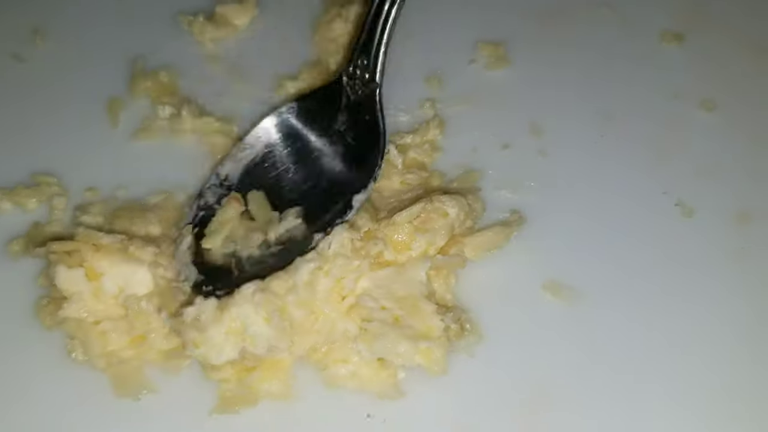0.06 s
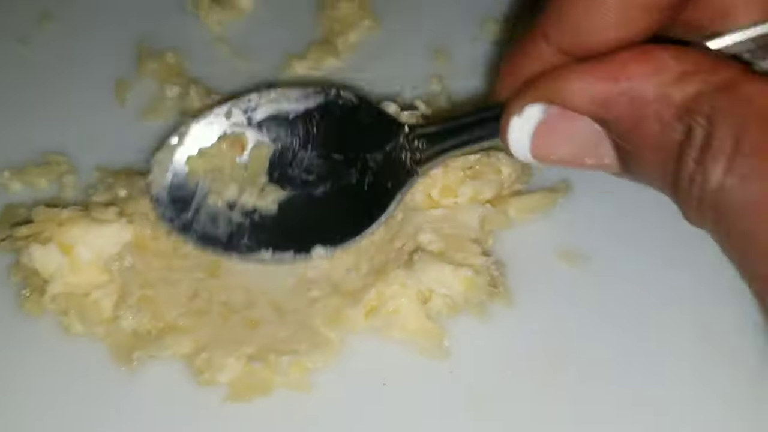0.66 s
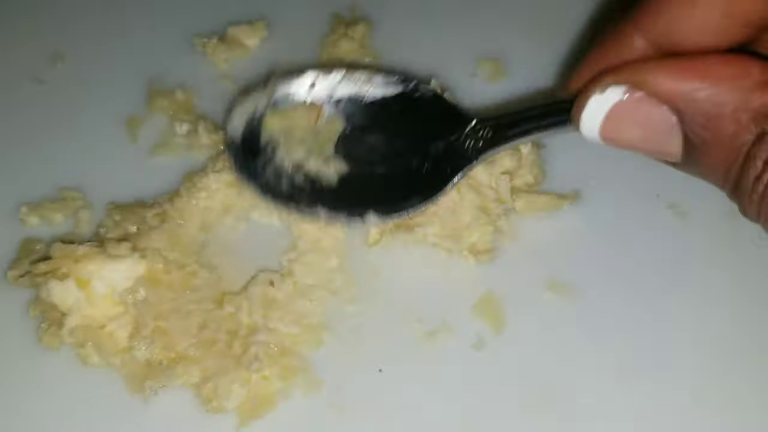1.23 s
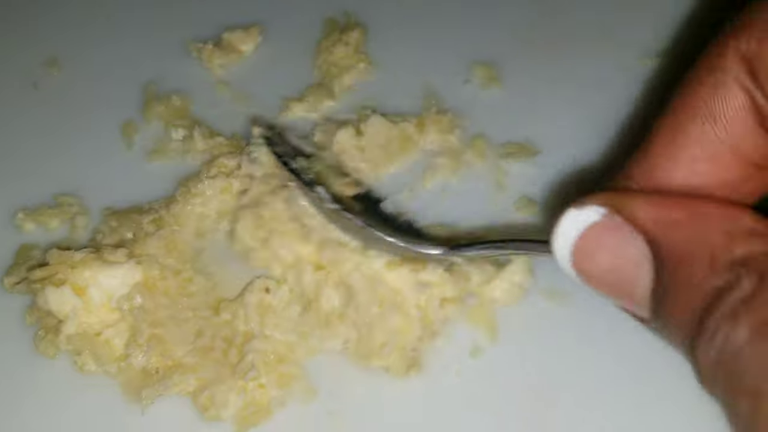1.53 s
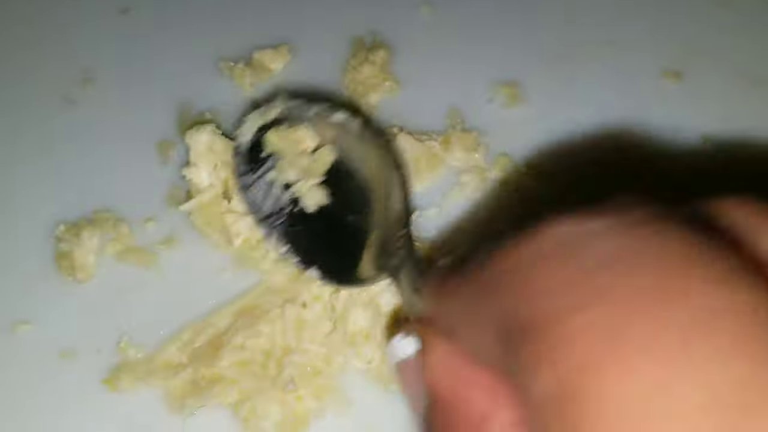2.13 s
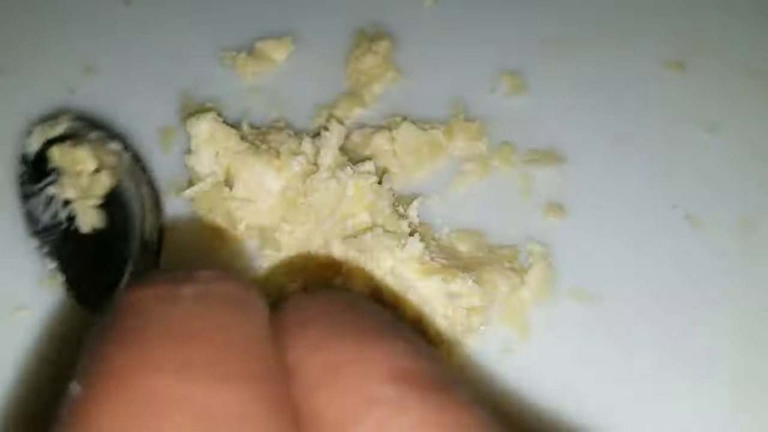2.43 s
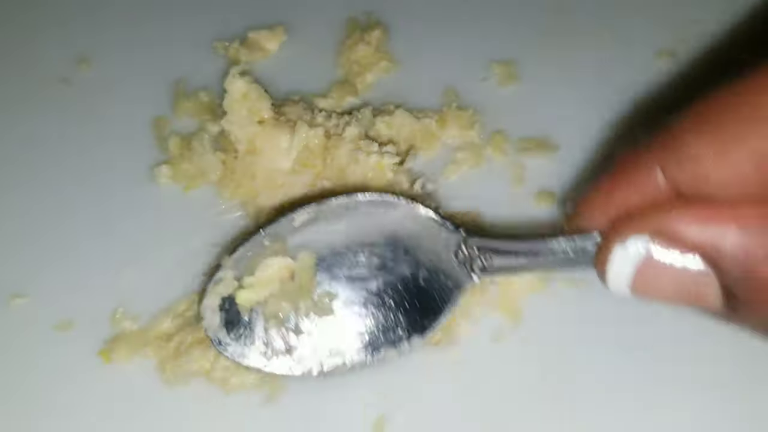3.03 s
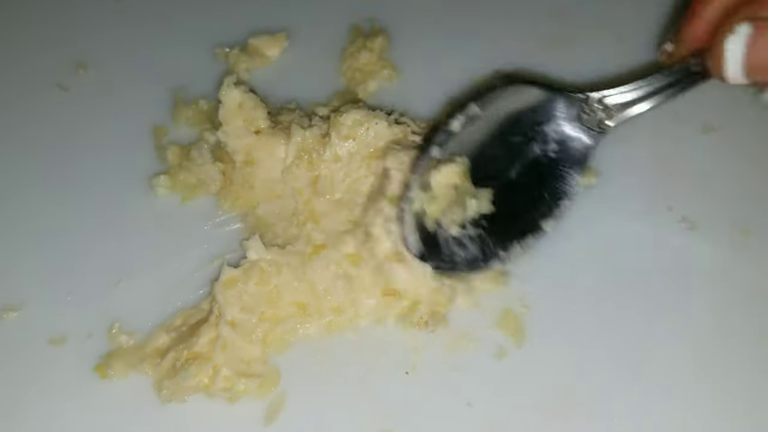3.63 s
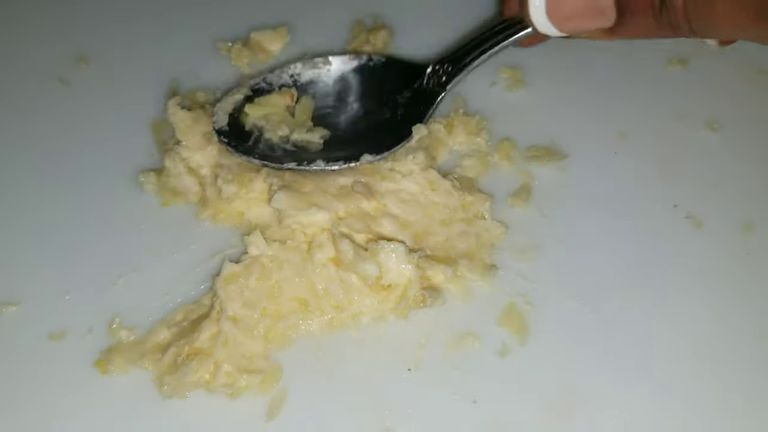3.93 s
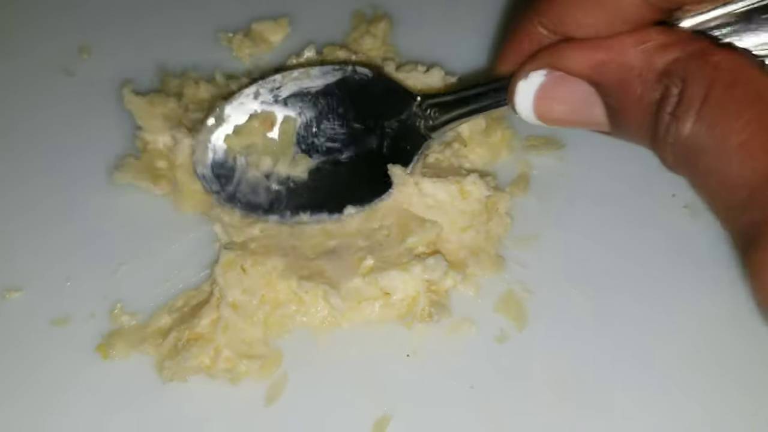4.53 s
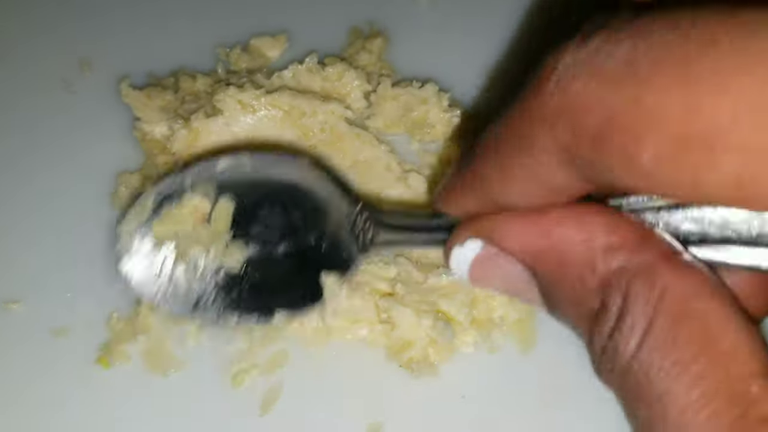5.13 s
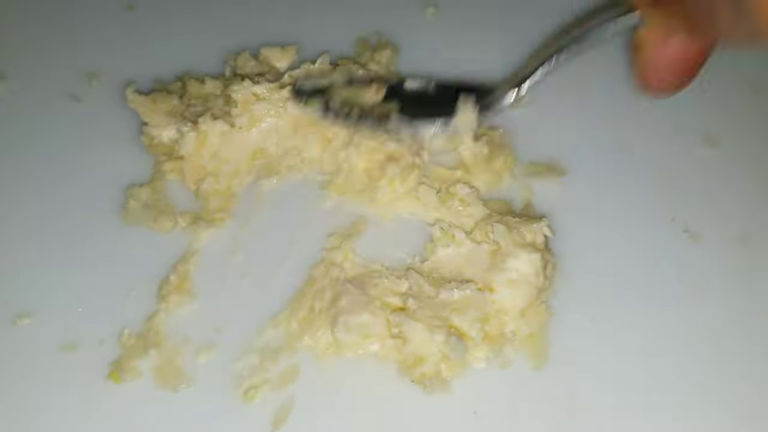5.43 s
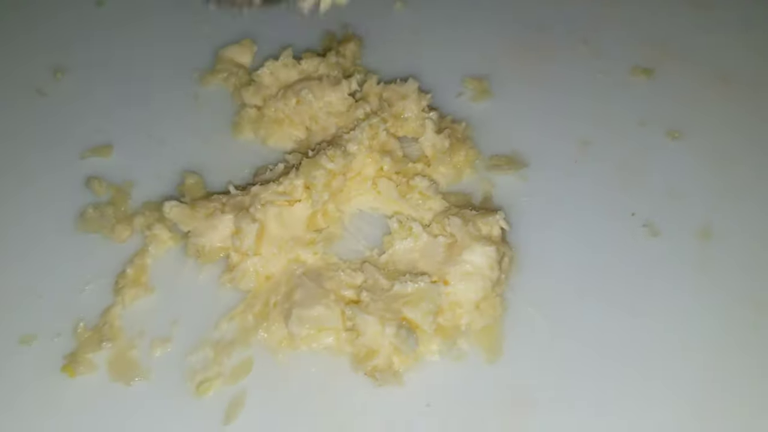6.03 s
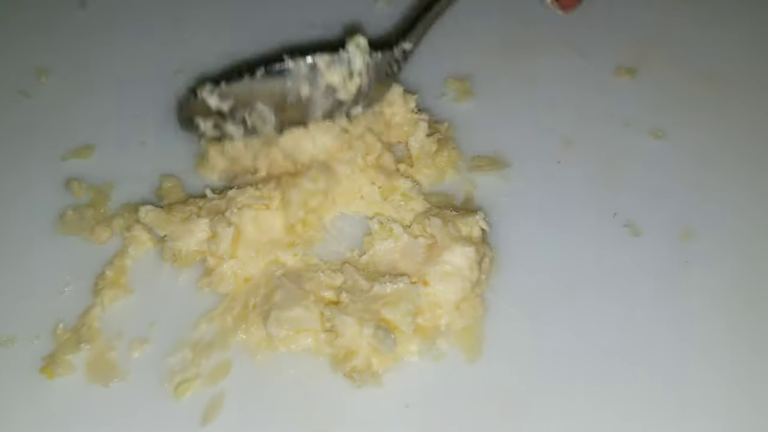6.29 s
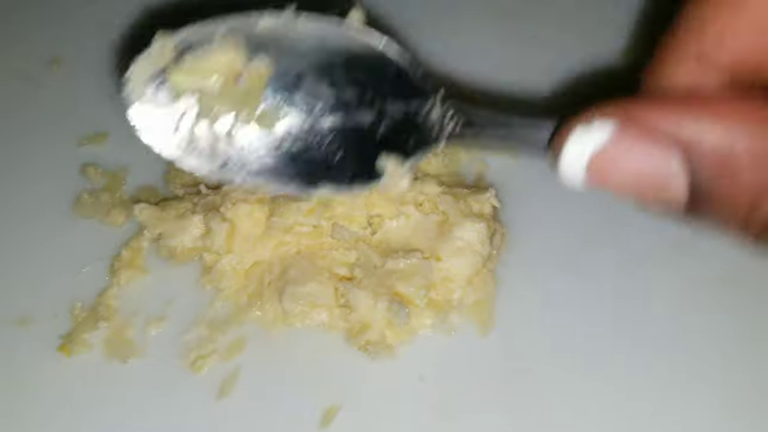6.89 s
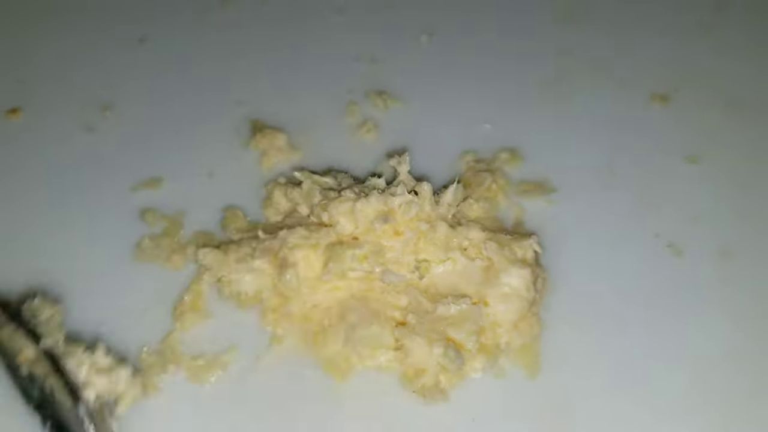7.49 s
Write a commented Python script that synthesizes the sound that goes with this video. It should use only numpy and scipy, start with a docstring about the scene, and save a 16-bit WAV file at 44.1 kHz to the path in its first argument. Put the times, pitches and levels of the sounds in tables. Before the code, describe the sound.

Soft wet smacks of butter and garlic being mashed, broken by a metal spoon's dull knocks and short scrapes on a cutting board.

```python
"""Butter crackles and smacks softly as a steel spoon mashes it with garlic, close by in a small kitchen.
The spoon knocks through onto a plastic cutting board, and each impact rings the modes of board and steel.
Its rim then drags, and stick-slip friction drives the board's modes into a growl. Between strokes, air
pockets burst as the butter peels off the steel. The room reverberates, and an appliance hums behind."""
import sys
import numpy as np
from scipy import signal
from scipy.fft import rfft, irfft, next_fast_len
from scipy.io import wavfile
from scipy.ndimage import map_coordinates

SR = 44100
rng = np.random.default_rng(int(sys.argv[2]) if len(sys.argv) > 2 else 0)


def inscribe(sig):
    """Save sig as 16-bit PCM at rate SR to the path in sys.argv[1].

    A 1-D sig is mono; a 2-D sig holds one channel per row.
    Samples are clipped to [-1, 1] before scaling.
    """
    pcm = np.round(np.clip(np.atleast_2d(sig).T, -1, 1) * 32767)
    wavfile.write(sys.argv[1], SR, pcm.astype(np.int16))


N = 341775

# modes of the board under the spoon: (frequency [Hz], level [dB], t60 [s])
BOARD_MODES = [(243, -12.5, 0.25), (416.5, 3.5, 0.093), (525, -6, 0.078), (615.7, -4, 0.064),
               (731, -9, 0.12), (814.4, -2.5, 0.1), (929.6, -1.5, 0.086), (1122, -12, 0.2),
               (1313, -1, 0.081), (1374, -5, 0.1), (1429, -2, 0.094), (1656.5, 7.5, 0.054),
               (1822, 3, 0.042), (1945, -4.5, 0.048), (2140, -14.5, 0.055), (2541, 0.5, 0.046),
               (2710, -8.5, .09), (2916, 1, 0.044)]
# modes of the spoon's bowl, damped by butter and fingers: (frequency [Hz], level [dB], t60 [s])
SPOON_MODES = [(5600, -19.5, .07), (5424, 2, 0.041), (7300, -10, .06), (8800, -12, 0.11),
               (8240, -13.5, 0.034), (10200, -3.5, 0.036)]
# spectra of an impact's three parts: (frequency [Hz], relative level [dB])
KNOCK_SPECTRUM = [(60, -40.5), (160, -9.5), (240, -6.5), (310, -9.5), (420, 3), (560, 3.5), (850, 2.5),
                  (1250, -1), (1700, -25), (3000, -39)]
CLACK_SPECTRUM = [(600, -18), (1200, 6.5), (1620, -1), (1950, 2), (2600, -7), (3300, -16), (6000, -47)]
CLICK_SPECTRUM = [(1500, -18), (3000, 3), (5500, 1.5), (8000, -4), (10500, -8.5), (13500, -19),
                  (15500, -13)]
# spoon strikes: (time [s], level [dB], clack [dB re knock], steel click [dB re knock])
IMPACTS = [(1.045, -4.5, -22, -32), (2.482, 12, 1, -12), (2.957, 9, -3, -18.5), (3.556, 14.5, -1.5, -14.5),
           (4.011, -23.5, -18, -22.5), (4.199, -14.5, -12, -17.5), (5.263, -12, -11, -14.5),
           (5.707, 12.5, -1, -12.5), (5.717, 2.5, 7, -19.5), (6.214, 13.5, -1, -24.5),
           (6.227, -1.5, 7.5, -37.5), (6.569, 15, -2, -21.5), (7.139, 12, -5.5, -24.5), (7.4, 7.5, -4, -28),
           (7.538, 3, -5.5, -33)]
# heavy pushes that shake the counter: (time [s], level [dB])
COUNTER_THUDS = [(1.05, -13), (2.487, -24), (3.56, -26)]

def knocks():
    """Impact excitation: a cushioned blow gives a dull knock, a bare one a clack and a steel click."""
    out, t = np.zeros((2, N)), np.arange(SR // 3) / SR
    onset_delay_s = .003  # each knock sounds 3 ms after its listed time

    def struck_board(t60, spike_db, spectrum):
        blow = burst(t60, spike_db) + amp(-6) * ring(BOARD_MODES, scatter_db=1.2)
        return unit_energy(coloured(blow, spectrum))

    for s, db, clack_db, click_db in IMPACTS:
        knock = struck_board(t60=.021, spike_db=-2.5, spectrum=KNOCK_SPECTRUM)
        clack = struck_board(t60=.061, spike_db=-20, spectrum=CLACK_SPECTRUM)
        click = unit_energy(coloured(burst(t60=.04, spike_db=-26), CLICK_SPECTRUM))
        click += amp(-7) * ring(SPOON_MODES, scatter_db=1.2)
        add(out, s + onset_delay_s, amp(db) * (knock + amp(clack_db) * clack + amp(click_db) * click))
    thud = unit_energy(np.sin(2 * np.pi * 52 * t) * np.minimum(t / .012, 1) * amp(-60 * t / .3))
    for s, db in COUNTER_THUDS:
        add(out, s, amp(db) * thud)
    return out


# friction spectra: (frequency [Hz], relative level [dB])
GROWL_SPECTRUM = [(60, -46), (170, -21.5), (310, -19.5), (410, -4), (480, -1.5), (620, 3.5), (800, -2),
                  (1050, -7.5), (1400, -16.5), (3000, -45.5)]
RASP_SPECTRUM = [(600, -36.5), (1200, 9), (1650, -0.5), (1950, 0), (2600, -11), (3300, -17), (4800, -19),
                 (5800, -21), (7000, -29), (9000, -27), (12000, -35), (15500, -40)]
# resonances of the board and of the pressed bowl: (frequency [Hz], bandwidth [Hz], relative level [dB])
GROAN_PEAKS = [(416, 30, 0)]
BOWL_PEAKS = [(5620, 300, 0.5), (8700, 250, -4.5), (10100, 400, -8)]
# the rim crosses the board: (time [s], rise [s], hold [s], growl [dB], rasp [dB re growl])
RIM_STROKES = [(1.084, .012, .02, -47.5, -11), (1.118, 0.011, 0.011, -46, -4),
               (1.537, 0.014, 0.036, -52.5, -6.5), (1.642, .01, .012, -66, 10.5),
               (2.497, 0.037, 0.064, -28, -1.5), (2.982, .01, 0.078, -35.5, -7),
               (3.068, .02, .024, -33, -17), (3.576, .025, 0.063, -28, -3.5), (5.247, .016, .05, -39, -1),
               (5.758, 0.047, 0.11, -22.5, -5), (6.234, 0.034, 0.094, -21, -3.5),
               (6.595, .05, 0.051, -22, -7), (7.153, 0.0081, 0.012, -27.5, -21),
               (7.216, 0.043, 0.053, -19, -5), (7.352, .01, 0.029, -40.5, -20),
               (7.415, 0.0075, 0.011, -28, -2.5), (7.569, .008, 0.024, -25.5, -6.5),
               (7.593, 0.027, 0.067, -20, -3), (7.725, 0.018, .02, -39.5, -16)]

def drags():
    """Stick-slip friction drives board and bowl: the rasp fades first, then the growl, last a groan."""
    rasp_lead_s, groan_rise_s = .0087, .018  # the rim flattens, so the rasp lets go early
    growls, rasps, groans = [], [], []
    for s, rise, hold, db, rasp_db in RIM_STROKES:
        growls.append((s, rise, hold, db))
        rasps.append((s, rise, max(hold - rasp_lead_s, 0), db + rasp_db))
        groans.append((s + rise + hold - groan_rise_s, groan_rise_s, .02, db - 10))
    vibration = 0
    for _ in range(5):  # the load shifts between spots on the rim, each with its own mix of modes
        slips = grains(per_s=400, spread_db=2.5) * amp(2.1 * wobble(70))
        response = burst(t60=.014, spike_db=-11) + amp(-7) * ring(BOARD_MODES, scatter_db=3)
        response += amp(-28) * ring(SPOON_MODES, scatter_db=1.5)
        vibration += convolved(slips, response)
    growl_shape = dict(climb_db=19, sag_db_per_s=70, release_db_per_s=595)
    growl = envelope(growls, **growl_shape) * unit(coloured(vibration, GROWL_SPECTRUM))
    groan = envelope(groans, **growl_shape) * resonate(vibration, GROAN_PEAKS)
    rasp = unit(coloured(vibration, RASP_SPECTRUM)) + amp(-25.5) * resonate(vibration, BOWL_PEAKS)
    rasp *= envelope(rasps, climb_db=20, sag_db_per_s=57, release_db_per_s=730)
    return growl + groan + rasp


# radiation pattern of the modes: (frequency [Hz], phase lead of the left channel [rad])
MODE_PHASE = [(400, .12), (650, .35), (900, 1), (1120, -.9), (1320, 1), (1630, -.5), (1900, -1.5),
              (2250, 1.1), (5500, 1.3), (9000, 1.9)]

def ring(modes, scatter_db):
    """Free vibration: a sum of damped modes, at new strengths for each blow; stereo, energy 1."""
    t, out = np.arange(SR // 3) / SR, 0
    for k, (hz, db, t60) in enumerate(modes):
        phase = along(MODE_PHASE, hz) * np.array([[.5], [-.5]])
        decay = amp(db + scatter_db * rng.normal() - 60 * t / t60)
        out += (-1) ** k * decay * np.sin(2 * np.pi * hz * t + phase)
    return unit_energy(out)


# left-right likeness of the close sounds: (frequency [Hz], coherence [-1 to 1])
NEAR_COHERENCE = [(400, 0.98), (620, 0.71), (850, 0.88), (1800, 0.19)]

def burst(t60, spike_db):
    """A transient: one spike, then dense flutter in exponential decay; stereo, energy 1."""
    t = np.arange(SR // 3) / SR
    flutter = unit_energy(noise_pair(len(t), NEAR_COHERENCE) * amp(-60 * t / t60))
    flutter[:, 0] = -amp(spike_db)
    return unit_energy(flutter)


# spectrum of bursting pockets: (frequency [Hz], relative level [dB])
BUTTER_SPECTRUM = [(1180, -40.5), (2000, -3.5), (2290, -16.5), (2990, -8.5), (3940, -8.5), (7610, -4),
                   (8580, -2), (12300, 2), (15500, -2.5)]
# the bowl presses into the butter: (time [s], rise [s], hold [s], level [dB])
BUTTER_SQUEEZES = [(0, .03, 0.23, -61.5), (.54, .2, 0.043, -57), (.765, .06, .012, -51),
                   (1.07, 0.22, 0.022, -50.5), (1.41, .03, 0.23, -56.5), (1.91, 0.11, 0.26, -65.5),
                   (2.6, .02, 0.11, -56.5), (3.09, 0.098, .1, -57), (3.7, 0.06, 0.26, -58.5),
                   (4.08, 0.055, .1, -55.5), (4.26, .03, 0.01, -47), (4.53, 0.26, .11, -55),
                   (5.1, .17, 0.07, -56), (5.39, 0.035, .05, -54.5), (5.91, 0.032, 0.067, -54.5),
                   (6.39, 0.041, .03, -53.5), (6.72, 0.057, 0.04, -56.5)]
# butter lets go of the steel: (time [s], level [dB])
BUTTER_SMACKS = [(0.292, -24.5), (.3196, -29), (0.5806, -28), (.604, -27), (.7776, -25), (.8452, -12),
                 (.8523, -19), (1.072, -29), (1.274, -14), (1.4226, -18.5), (1.58, -21.5), (1.685, -23),
                 (2.1907, -22.5), (2.203, -22.5), (2.4266, -12.5), (2.689, -21), (2.705, -26),
                 (3.1453, -29), (3.807, -29), (3.967, -27), (4.2844, -21), (4.6964, -29), (4.806, -20.5),
                 (4.8938, -24), (4.918, -25), (5.1046, -30), (5.45, -21.5), (6.0122, -24.5), (6.446, -21),
                 (6.787, -24), (6.833, -24.5)]
SWELL_SHAPE = dict(climb_db=10, sag_db_per_s=8, release_db_per_s=410)

def butter():
    """Cavity rupture: small air pockets crackle under pressure, larger ones smack as the butter peels."""
    pops = air_pockets(count=2000, median_hz=11000, decay_cycles=1.3)
    scatter_t60 = .013  # each pop scatters off spoon, hand and board
    decay = amp(-60 * np.arange(SR // 10) / SR / scatter_t60)
    scatter_power = np.abs(convolved(pops ** 2, decay))
    scatter = unit(noise_pair(N, NEAR_COHERENCE) * np.sqrt(scatter_power))
    crackle = unit(coloured(pops + amp(-1) * scatter, BUTTER_SPECTRUM))
    out = envelope(BUTTER_SQUEEZES, **SWELL_SHAPE) * crackle
    for s, db in BUTTER_SMACKS:
        smack = coloured(burst(t60=.034, spike_db=-10), BUTTER_SPECTRUM)
        add(out, s, amp(db) * unit_energy(smack))
    return out


def air_pockets(count, median_hz, decay_cycles):
    """Damped oscillation: each pocket pings at a random time, pitch and size; stereo, rms 1."""
    n = np.arange(96)
    start = rng.integers(0, N - len(n), (count, 1))
    hz = np.minimum(median_hz * np.exp(.703 * rng.standard_normal((count, 1))), SR / 2)
    size = amp(17 * rng.random((count, 1)) ** 2)  # most are small
    cycles = hz * n / SR
    decay = size * np.exp(-cycles / decay_cycles)
    pings = [decay * np.sin(2 * np.pi * (cycles + phase)) for phase in rng.random((2, count, 1))]
    return unit(np.array([np.bincount((start + n).ravel(), ping.ravel(), N) for ping in pings]))


# spectrum of the soft hiss: (frequency [Hz], relative level [dB])
SOFT_HISS_SPECTRUM = [(1500, -25.5), (2300, -6.5), (2900, -0.5), (3700, -13), (6000, -21)]
# its one swell: (time [s], rise [s], hold [s], level [dB])
SOFT_HISS_SWELLS = [(3.21, .04, .035, -55.5)]

def soft_hiss():
    """Band-limited noise: a faint, short, breath-like hiss near 3 kHz."""
    hiss = unit(coloured(noise_pair(N, NEAR_COHERENCE), SOFT_HISS_SPECTRUM))
    return envelope(SOFT_HISS_SWELLS, **SWELL_SHAPE) * hiss


# left-right likeness of the room's sound: (frequency [Hz], coherence [-1 to 1])
ROOM_COHERENCE = [(60, 0.94), (130, 0.96), (290, 0.79), (640, 0.58), (1410, -0.33), (3100, 0.065)]
# the kitchen's reverberation time: (frequency [Hz], t60 [s])
ROOM_DECAY = [(200, 0.29), (1000, 0.29), (4000, 0.42), (12000, 0.18)]

def kitchen(x):
    """Reverberation: reflections off walls and cupboards die away, each frequency at its own rate."""
    hz, t, spectra = signal.stft(noise_pair(SR // 2, ROOM_COHERENCE), SR, nperseg=256)
    decay = amp(-60 * t / along(ROOM_DECAY, hz)[:, None])
    onset = np.minimum(t / .002, 1)
    _, tail = signal.istft(spectra * decay * onset, SR, nperseg=256)
    return convolved(x, unit_energy(tail))


# room noise: (frequency [Hz], relative level [dB])
HUSH_SPECTRUM = [(13, -53), (22, -33.5), (39, -20), (61, -3), (80, -16.5), (108, -7.5), (142, -15),
                 (172, -16.5), (192, -16.5), (227, -12.5), (282, -20.5), (352, -17.5), (737, -27.5),
                 (801, -26), (918, -28), (1350, -27.5), (1590, -33), (2150, -39), (2680, -35),
                 (4270, -43.5), (9200, -48), (12400, -41), (15500, -44)]
# the appliance's tones: (frequency [Hz], rms level [dB])
HUM_TONES = [(58.5, -54.5), (93, -58.5), (176, -64), (220.5, -60.5), (423, -65), (808, -74)]

def background():
    """Ambient noise: rumble and hiss under an appliance's tones, which waver in amplitude and phase."""
    t, hum = np.arange(N) / SR, 0
    hush = amp(-51) * unit(filtered(noise_pair(N, ROOM_COHERENCE), lambda hz: amp(along(HUSH_SPECTRUM, hz))))
    for hz, db in HUM_TONES:
        waver = amp(1.8 * wobble(9.7))
        drift = .7 * wobble(10)
        hum += amp(db) * unit(waver * np.sin(2 * np.pi * hz * t + drift))
    return hush + hum


def amp(db):
    """Decibels to amplitude ratio."""
    return 10 ** (np.asarray(db) / 20)


def unit(x):
    """Normalisation to rms 1."""
    return x / np.sqrt(np.mean(x ** 2) + 1e-20)


def unit_energy(x):
    """Normalisation to energy 1 per channel."""
    return x / np.linalg.norm(x, axis=-1, keepdims=True)


def along(points, hz):
    """Interpolation of (frequency [Hz], value) points on a log axis."""
    frequencies, values = np.transpose(points)
    return np.interp(np.log(hz + 1), np.log(frequencies), values)


def wobble(knots_per_s):
    """Random modulation: a smooth curve through Gaussian knots."""
    knots = rng.standard_normal(int(N * knots_per_s / SR) + 4)
    return map_coordinates(knots, [np.arange(N) * knots_per_s / SR])


def grains(per_s, spread_db):
    """Shot noise: random impulses of uneven size, rms 1."""
    size = amp(spread_db * np.minimum(rng.exponential(size=N), 3))
    return unit((rng.random(N) < per_s / SR) * size * rng.choice([-1, 1], N))


def noise_pair(size, coherence):
    """Partial coherence: the ratio of mid to side noise sets how alike left and right are."""
    def weights(hz):
        angle = np.arccos(np.clip(along(coherence, hz), -1, 1)) / 2
        return np.array([np.cos(angle), np.sin(angle)])
    mid, side = filtered(rng.standard_normal((2, size)), weights)
    return np.array([mid + side, mid - side])


def filtered(x, response):
    """Linear filtering: the spectrum of x times response(hz)."""
    size = next_fast_len(x.shape[-1] + 8192)
    hz = np.fft.rfftfreq(size, 1 / SR)
    return irfft(rfft(x, size) * response(hz), size)[..., :x.shape[-1]]


def convolved(x, response):
    """Convolution with an impulse response, cut to the length of x."""
    return signal.fftconvolve(np.atleast_2d(x), np.atleast_2d(response), axes=1)[:, :x.shape[-1]]


def coloured(x, spectrum, size=4096):
    """Minimum-phase filtering: folding the cepstrum makes the given spectrum causal."""
    gain = amp(along(spectrum, np.fft.rfftfreq(size, 1 / SR)))
    cepstrum = irfft(np.log(gain))
    cepstrum[1:size // 2] *= 2
    cepstrum[size // 2 + 1:] = 0
    return convolved(x, irfft(np.exp(rfft(cepstrum))))


def resonate(x, peaks):
    """Forced vibration: x drives second-order resonators in parallel; rms 1."""
    def response(hz):
        return sum(amp(db) * 1j * hz * width / (centre ** 2 - hz ** 2 + 1j * hz * width)
                   for centre, width, db in peaks)
    return unit(filtered(x, response))


def envelope(strokes, climb_db, sag_db_per_s, release_db_per_s):
    """Amplitude envelope: each stroke climbs, sags while held, then decays exponentially."""
    t, gain = np.arange(N) / SR, np.zeros(N)
    for s, rise, hold, db in strokes:
        held = t - s - rise
        below_peak = climb_db * np.clip(-held / rise, 0, 1)
        sag = sag_db_per_s * np.clip(held, 0, hold)
        release = release_db_per_s * np.maximum(held - hold, 0)
        onset = np.clip((t - s) / .006, 0, 1)
        gain += amp(db - below_peak - sag - release) * onset
    return gain


def add(track, s, sound):
    """Superposition: mix a sound into the track at time s."""
    start = max(round(s * SR), 0)
    track[:, start:start + sound.shape[-1]] += sound[..., :N - start]


# stereo balance of the board: (frequency [Hz], left minus right [dB])
BOARD_BALANCE = [(150, 0), (380, 2), (700, 2), (1290, -1), (2380, -5), (4400, -1.5), (8100, -1.5),
                 (15000, -1.5)]

def scene():
    """Direct and reverberant fields add: board and butter close by, the kitchen around them."""
    board = filtered(knocks() + drags(), lambda hz: amp(np.outer([.5, -.5], along(BOARD_BALANCE, hz))))
    soft = butter() + soft_hiss()
    return board + amp(-9.5) * kitchen(board) + soft + amp(-4.5) * kitchen(soft) + background()


def record(dry):
    """Band limiting: a steep low-pass removes the highest treble."""
    cutoff_hz = 15600
    return filtered(dry, lambda hz: 1 / np.sqrt(1 + (hz / cutoff_hz) ** 200))


dry = scene()
out = record(dry)
inscribe(out)
```